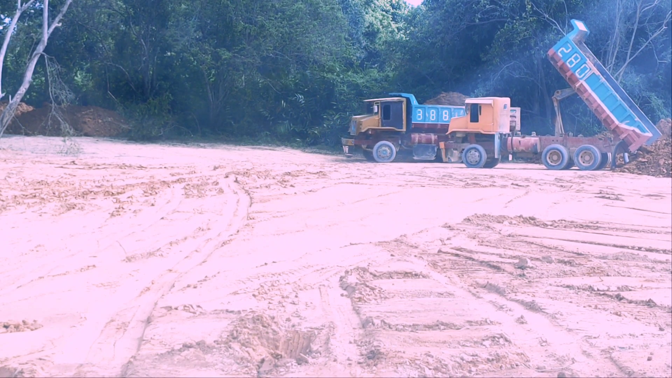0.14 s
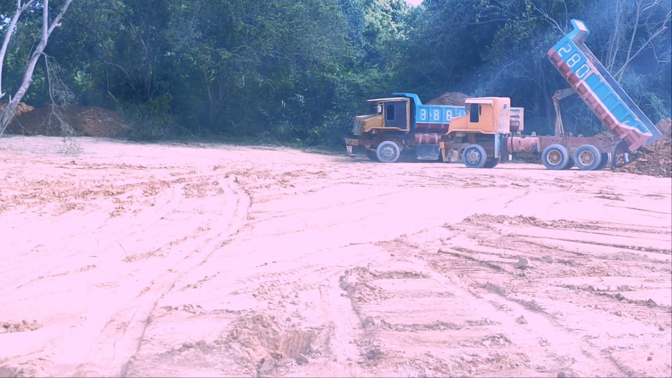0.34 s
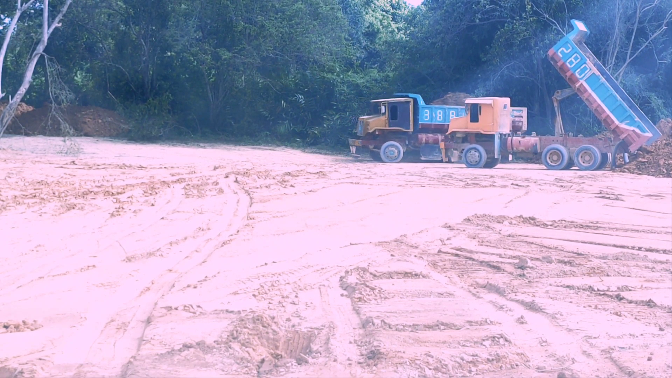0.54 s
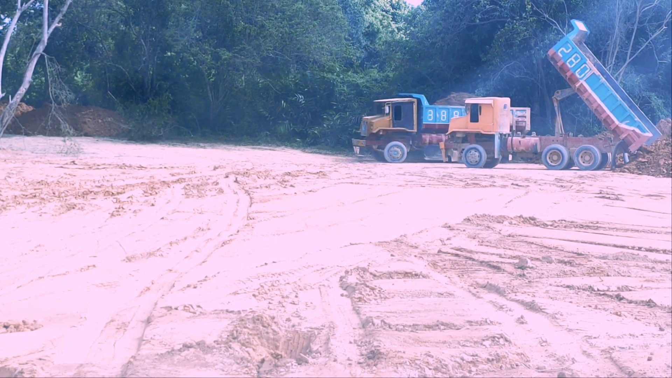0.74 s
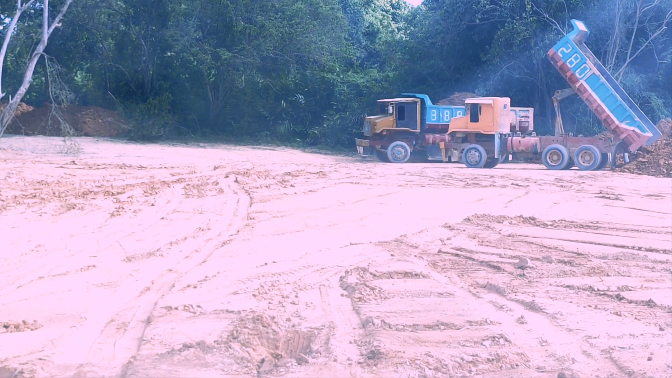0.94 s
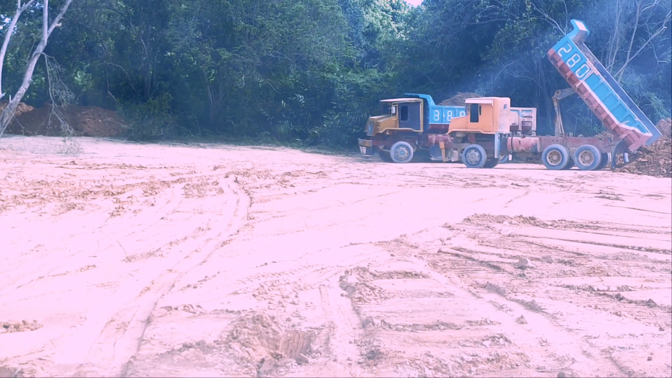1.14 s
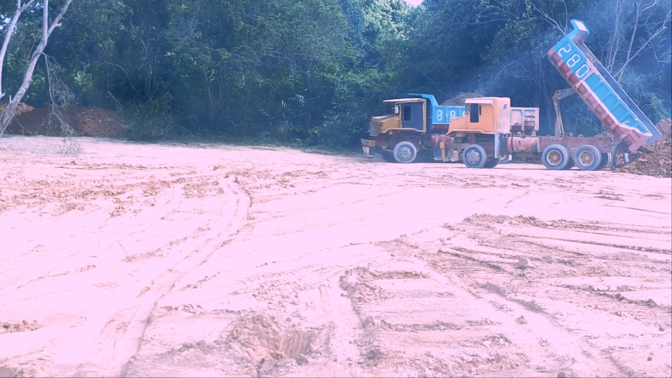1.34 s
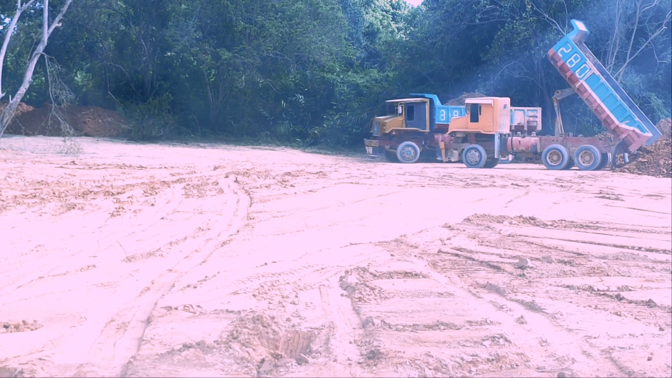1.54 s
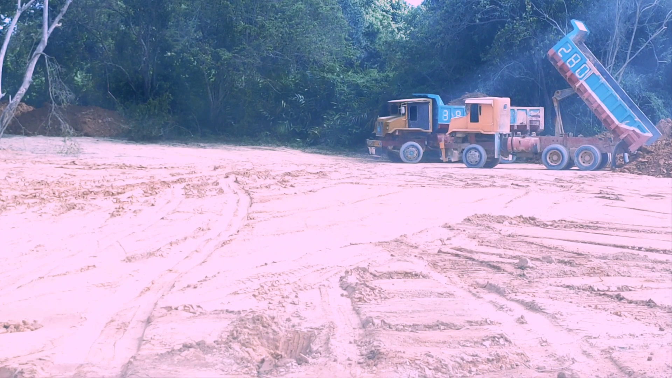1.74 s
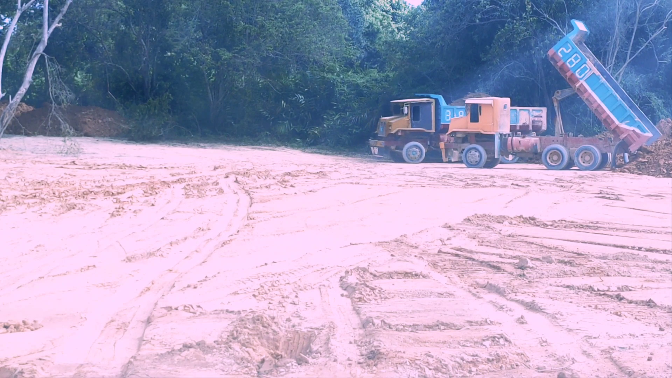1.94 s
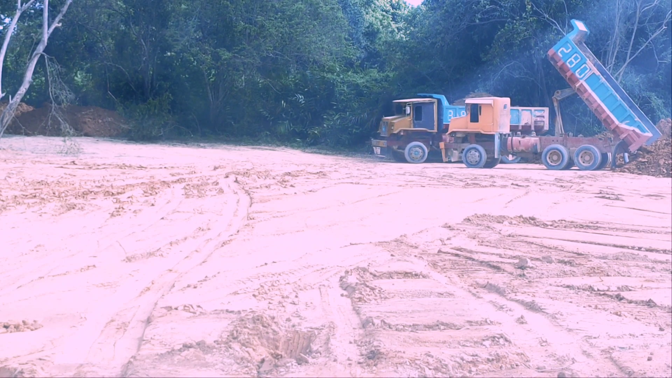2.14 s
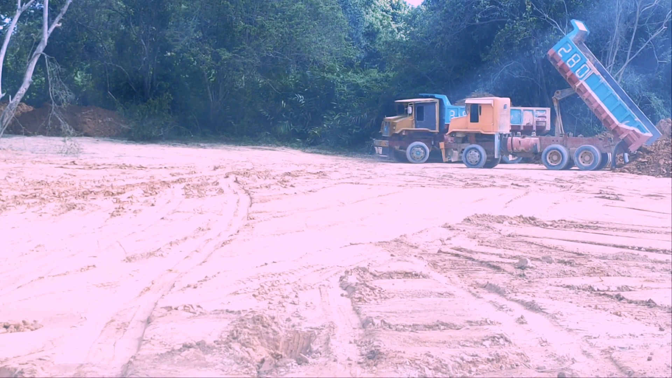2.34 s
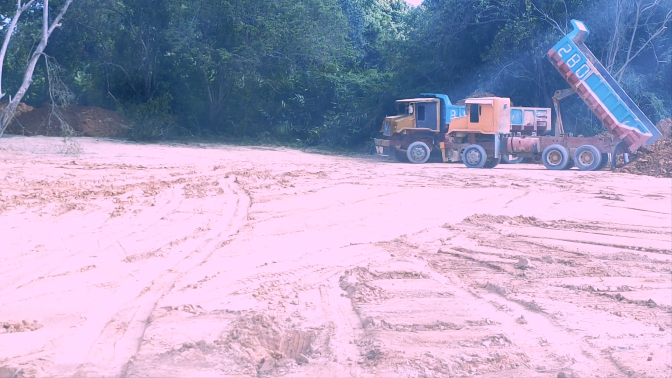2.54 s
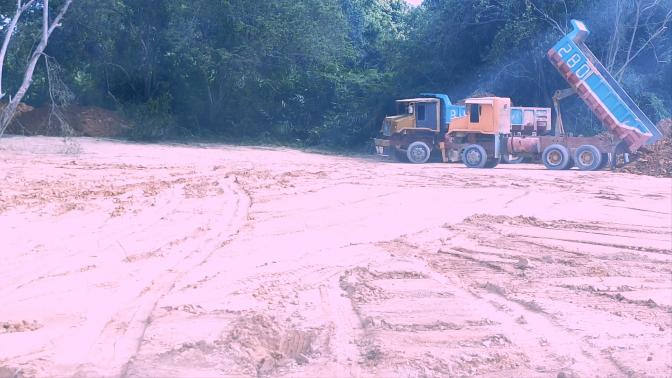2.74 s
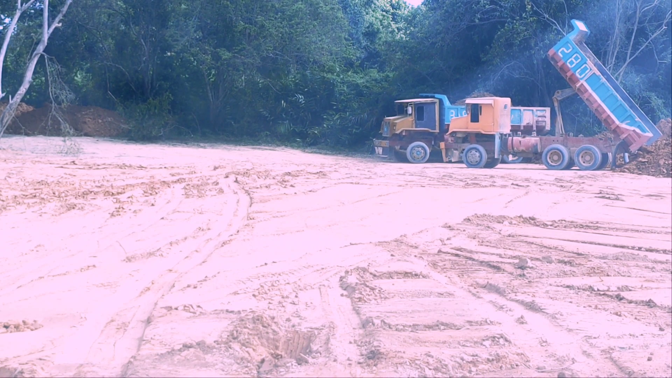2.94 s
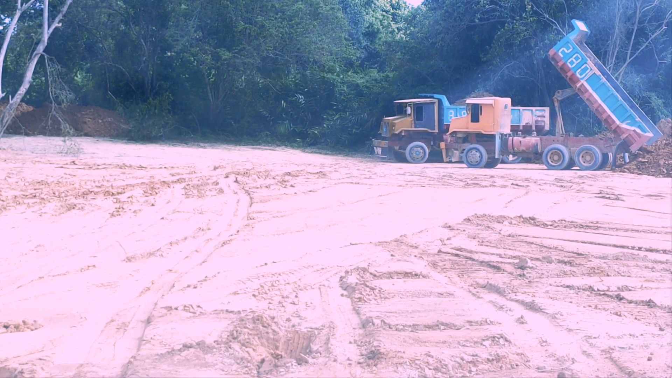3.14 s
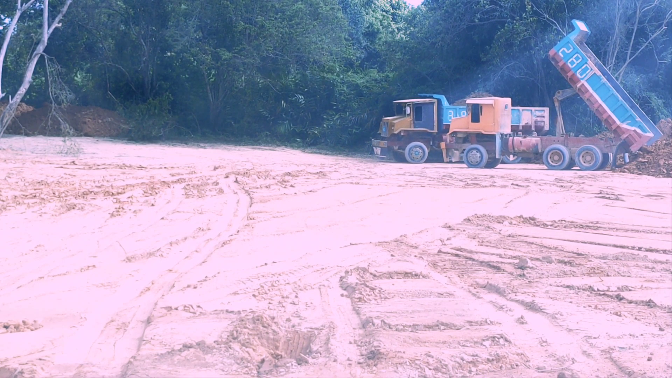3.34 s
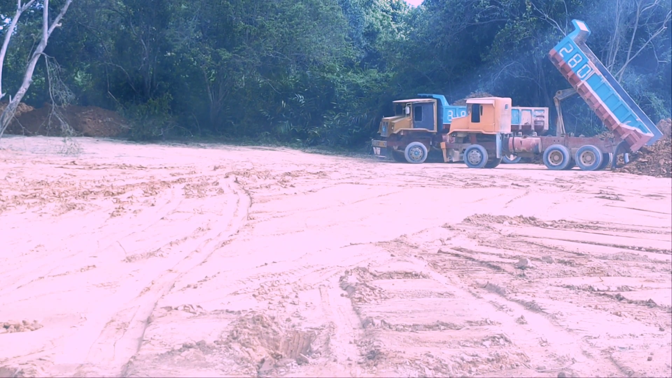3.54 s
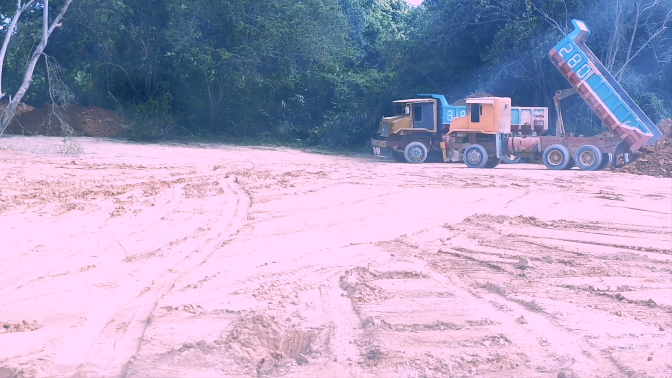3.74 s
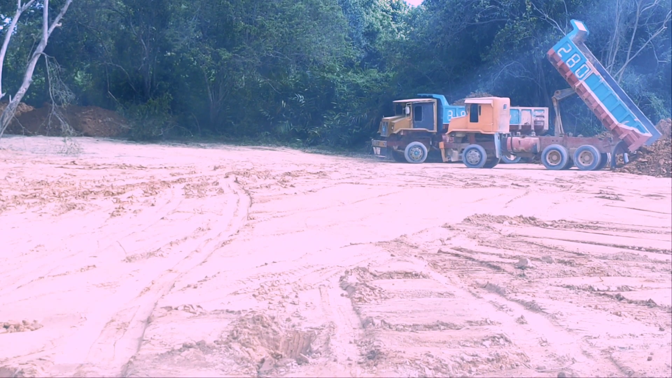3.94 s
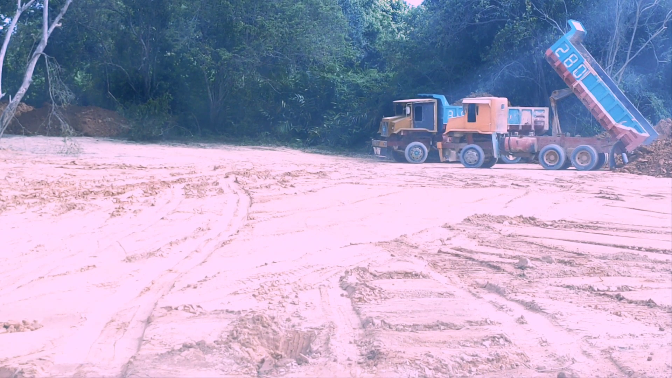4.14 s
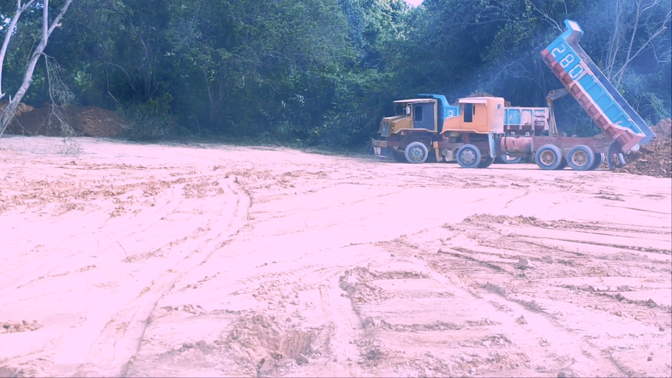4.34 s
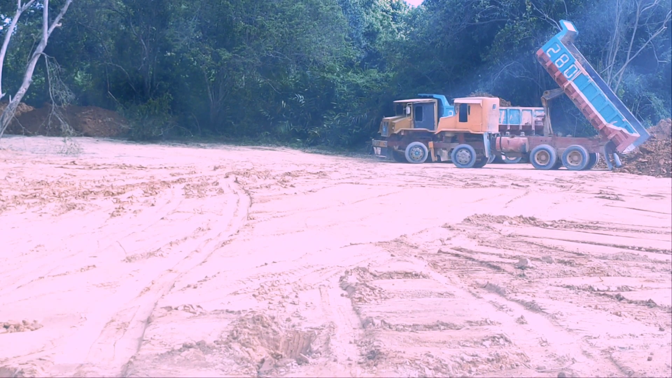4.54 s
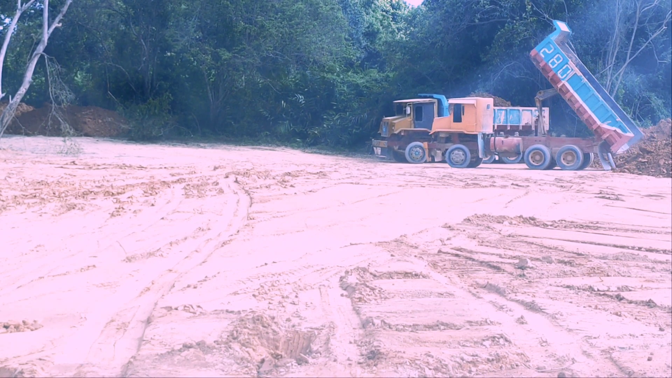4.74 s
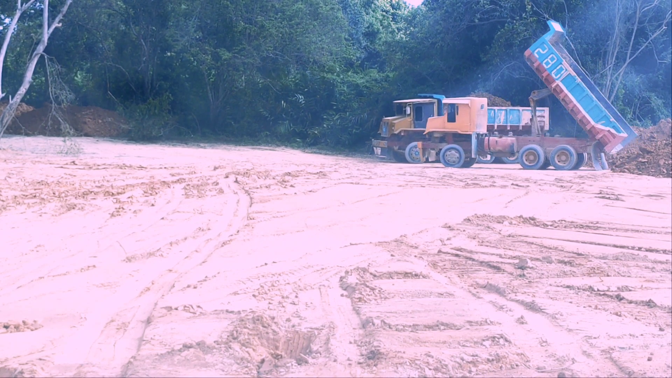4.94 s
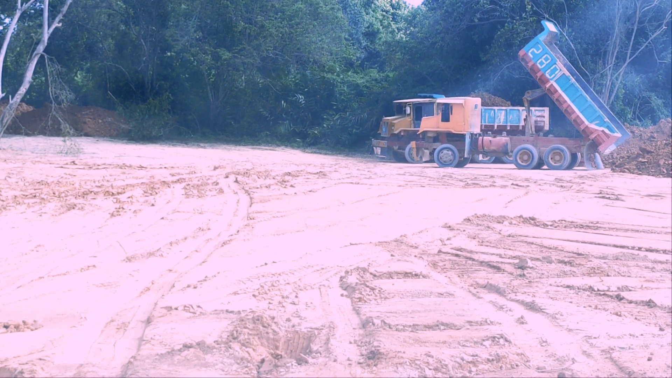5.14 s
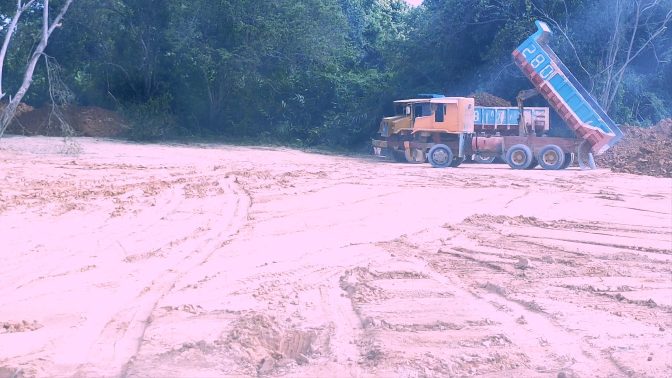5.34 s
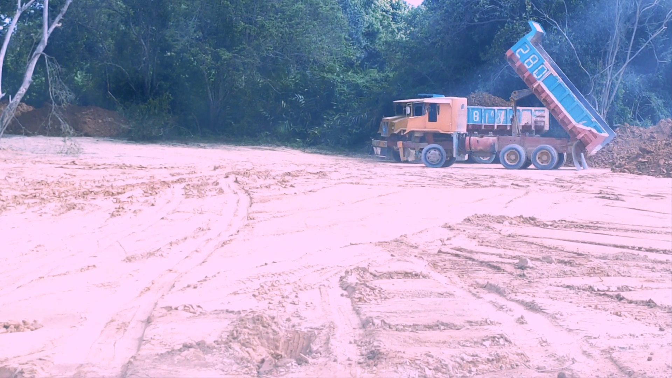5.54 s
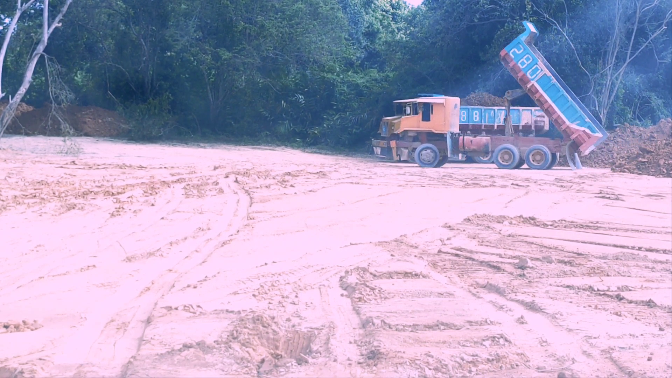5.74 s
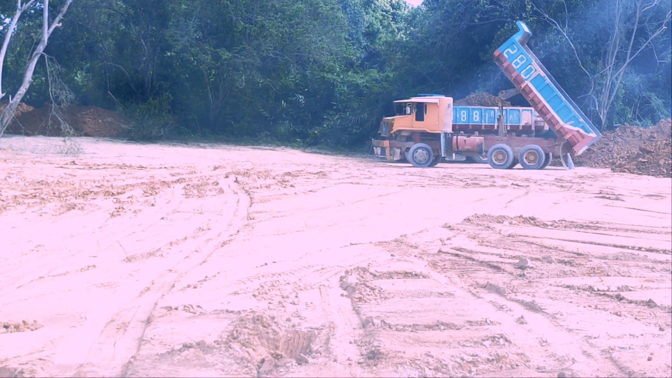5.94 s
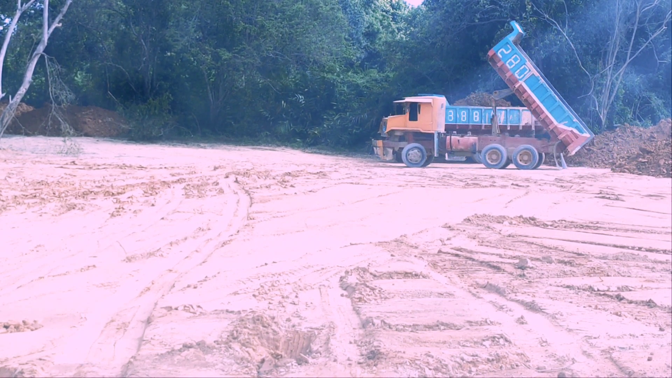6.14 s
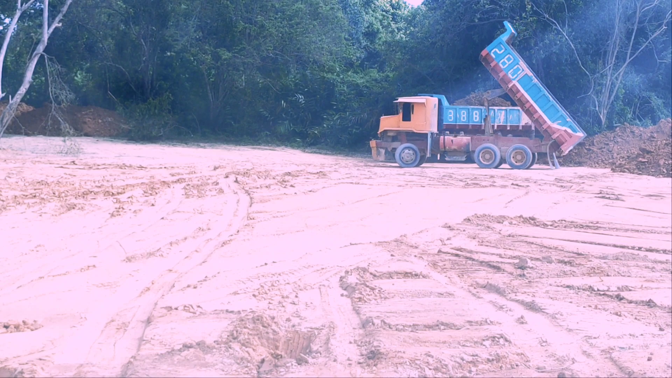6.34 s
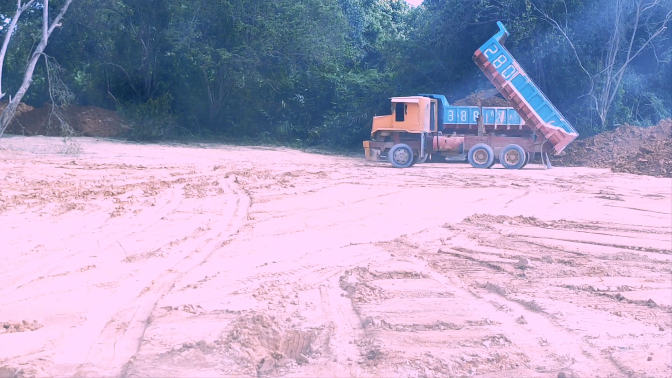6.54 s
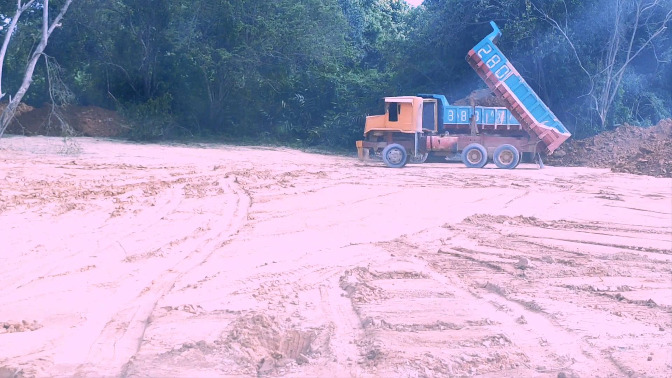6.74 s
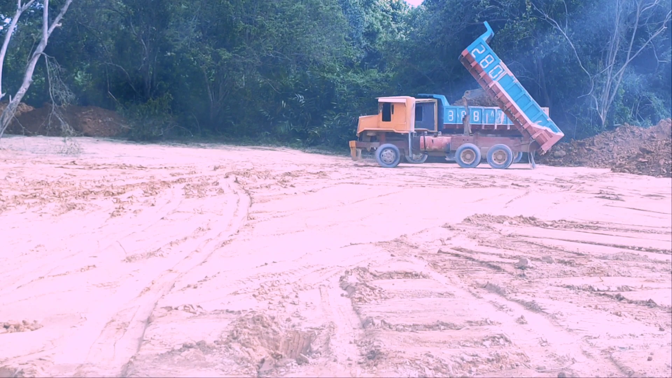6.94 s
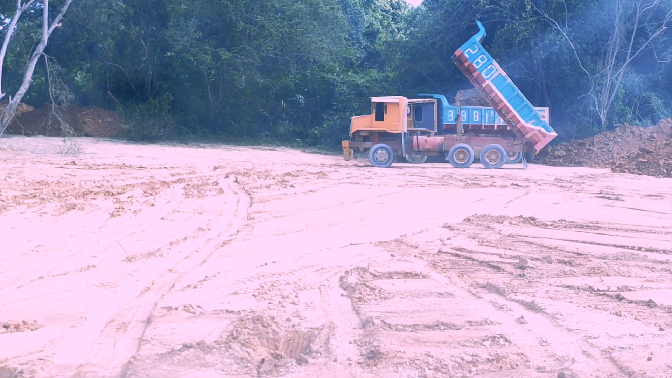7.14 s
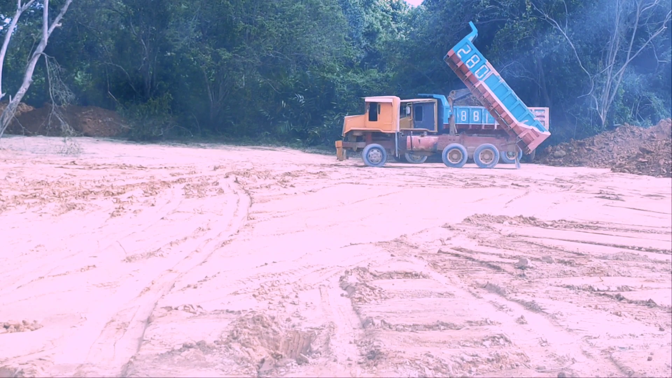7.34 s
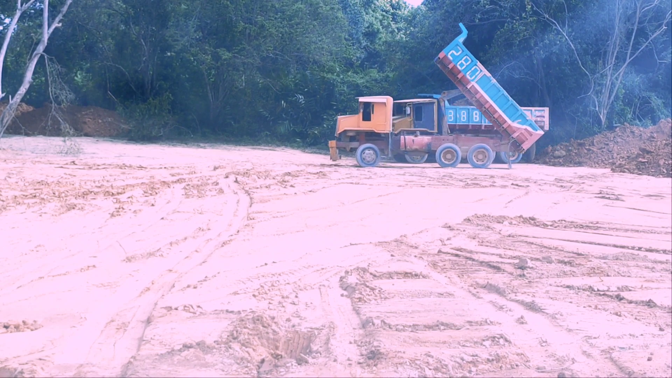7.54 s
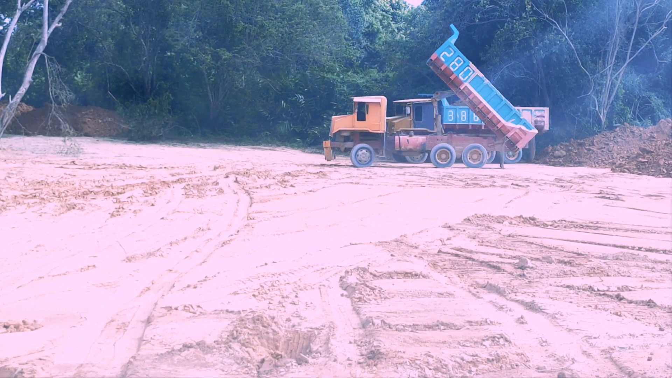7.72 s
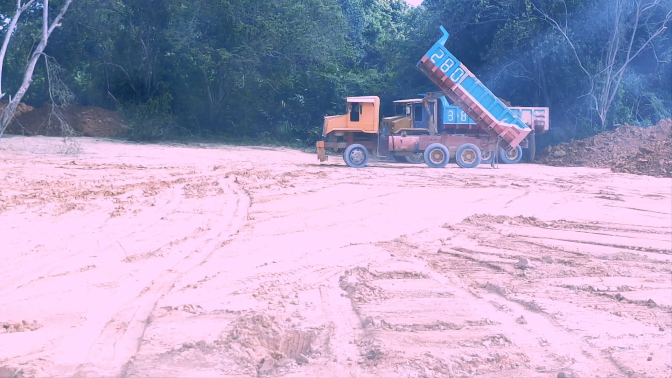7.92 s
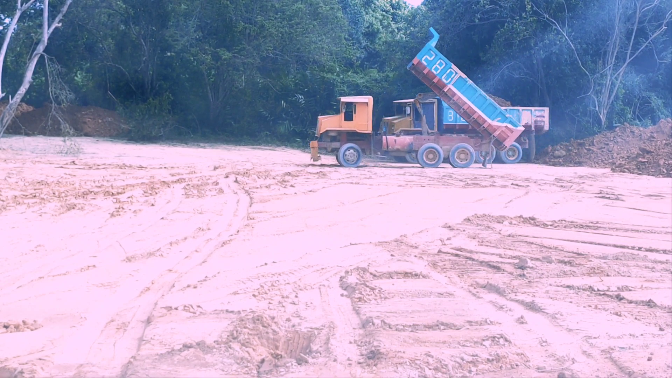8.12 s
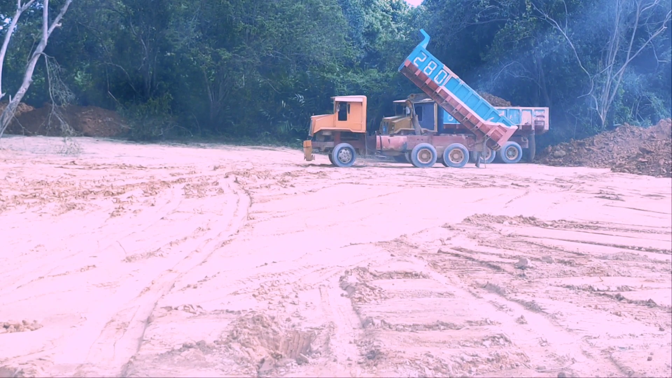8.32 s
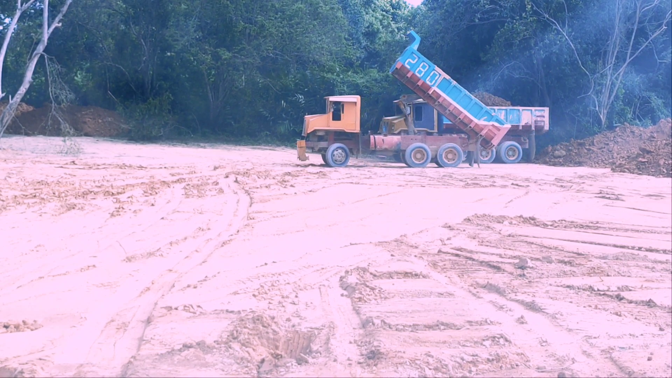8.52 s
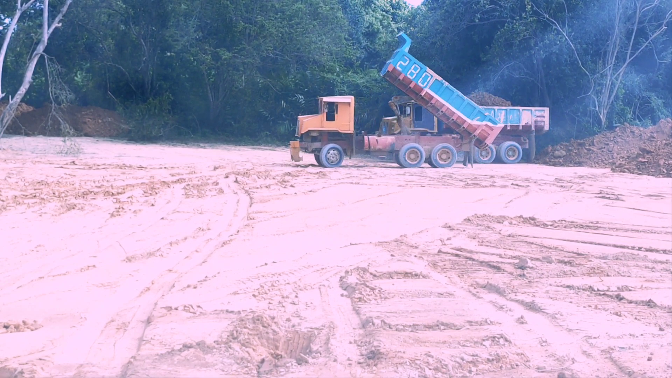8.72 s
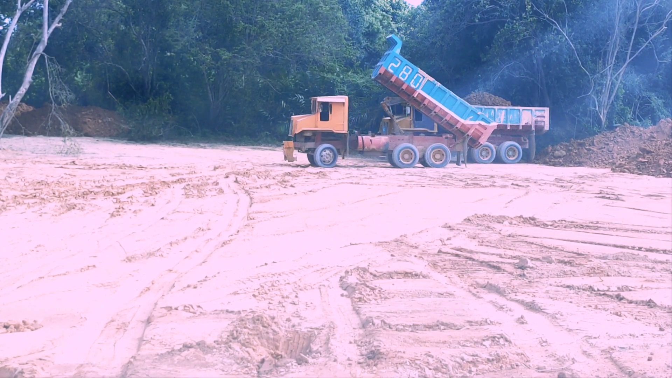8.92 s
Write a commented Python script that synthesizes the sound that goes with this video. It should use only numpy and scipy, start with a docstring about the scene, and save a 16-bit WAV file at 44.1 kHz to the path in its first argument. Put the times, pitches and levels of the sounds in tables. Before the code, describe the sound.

Low diesel truck rumble outdoors, one engine gradually revving up and approaching, while fingers rub, click and squeak on the camera.

```python
"""An earthworks site: two diesel dump trucks idle while a V8 pulls away and comes closer.
Their exhausts throb at the firing rates over a dull mechanical roar, scattered by a wooded slope.
Fingers shift on the hand-held camera: skin slides, catches and chatters on the case, which
rustles, ticks, thuds and squeaks next to the right microphone port."""
import sys
import numpy as np
from scipy import signal
from scipy.fft import rfft, irfft, next_fast_len
from scipy.io import wavfile
from scipy.ndimage import uniform_filter1d, map_coordinates

SR = 44100
rng = np.random.default_rng(int(sys.argv[2]) if len(sys.argv) > 2 else 0)


def materialize(psi):
    """Save the field psi as 16-bit PCM at rate SR to the path in sys.argv[1].

    A 1-D psi becomes a single channel; in a 2-D psi each row is a channel.
    """
    bounded = np.clip(np.atleast_2d(psi).T, -1, 1)
    quanta = np.round(bounded * 32767).astype(np.int16)
    wavfile.write(sys.argv[1], SR, quanta)


N = 400428
CYLINDERS = 8


def amp(db):
    """Decibels to gain."""
    return 10 ** (np.asarray(db) / 20)


def unit(x):
    """Scale to rms 1."""
    return x / np.sqrt(np.mean(x ** 2) + 1e-20)


def along(points, hz):
    """(Hz, value) points read on a log axis."""
    knots_hz, values = np.transpose(points)
    return np.interp(np.log(hz + 1), np.log(knots_hz + 1), values)


def curves(rows):
    """One value per sample for each column after the time."""
    times_s, *columns = np.transpose(rows)
    return [np.interp(np.arange(N) / SR, times_s, column) for column in columns]


def wobble(rate_hz):
    """Smooth random curve, rate_hz knots a second."""
    knots = rng.standard_normal(int(N * rate_hz / SR) + 4)
    grid = np.arange(0, len(knots), 1 / 8)
    return np.interp(np.arange(N) * rate_hz / SR, grid, map_coordinates(knots, [grid], mode="nearest"))


def filtered(x, response):
    """x through a complex frequency response."""
    size = next_fast_len(N + SR // 2)
    return irfft(rfft(x, size) * response(np.fft.rfftfreq(size, 1 / SR)), size)[..., :N]


def coloured(x, spectrum):
    """x through a (Hz, dB) spectrum, at rms 1."""
    return unit(filtered(x, lambda hz: amp(along(spectrum, hz))))


def resonances(modes, hz):
    """Causal response of (centre Hz, width Hz, dB) modes, alternating in sign."""
    return sum((-1) ** k * amp(db) * 1j * hz * width / (centre ** 2 - hz ** 2 + 1j * hz * width)
               for k, (centre, width, db) in enumerate(modes))


def add(out, start_s, sound):
    """Mix a short sound into out."""
    out[:, round(start_s * SR):][:, :sound.shape[1]] += sound


def burst(response, t60_s, attack_s):
    """One contact: a pair of filtered noises, dying away."""
    t = np.arange(SR // 4) / SR
    noise = rng.standard_normal((2, len(t)))
    body = irfft(rfft(noise) * response(np.fft.rfftfreq(len(t), 1 / SR)), len(t))
    return unit(body) * amp(-60 * t / t60_s) * (1 - np.exp(-t / attack_s))


def friction(grain_db):
    """Skin on plastic: noise of tiny, uneven slips."""
    return unit(rng.standard_normal((2, N)) * amp(grain_db * wobble(1500) + 0.72 * wobble(90)))


def crunch(rate_hz, spread_db, t60_s):
    """Separate slips, a few much larger than the rest; each rings at three random pitches."""
    draw = rng.random((int(rate_hz * N / SR), 8))
    t = np.arange(int(t60_s * SR)) / SR
    indices = ((draw[:, :1] * N).astype(int) + np.arange(len(t))).ravel()
    envelopes = amp(spread_db * np.minimum(-np.log(draw[:, 1:2]), 3.5) - 60 * t / t60_s)
    pitches_hz = (1500 + 14000 * draw[:, 2:]).T.reshape(2, 3, -1, 1)
    slips = [envelopes * np.sin(2 * np.pi * hz * t).sum(0) for hz in pitches_hz]
    return unit(np.array([np.bincount(indices, channel.ravel(), N)[:N] for channel in slips]))


def moving_contact(x, patchy_db):
    """The scrape changes colour as the point of contact moves."""
    spectra = signal.stft(x, nperseg=512)[2]
    patches = uniform_filter1d(rng.standard_normal(spectra.shape[1:]), size=4, axis=0)
    patches = uniform_filter1d(patches, size=9, axis=1)
    return unit(signal.istft(spectra * amp(patchy_db * unit(patches)), nperseg=512)[1][:, :N])


def held_case(x, dull, ringing, grip_db):
    """The case colours the scrape; the grip damps now one resonance, now another."""
    # Each row: centre in Hz, width in Hz, gain in dB.
    case_modes = [(2440, 160, -5), (3355, 60, 3), (3485, 55, 2), (5420, 130, -4), (5780, 70, 0),
                  (6380, 60, 0), (7210, 110, -6), (7600, 280, -3), (9420, 160, -5), (9790, 190, -6),
                  (12300, 150, -8), (14600, 500, -5)]
    hz, t, spectra = signal.stft(x, SR, nperseg=1024)
    grip = unit(uniform_filter1d(rng.standard_normal((len(case_modes), len(t))), size=14, axis=1))
    mode_power = np.array([abs(resonances([mode], hz)) for mode in case_modes]).T ** 2
    ring_power = mode_power @ amp(grip_db * grip) ** 2
    return signal.istft(spectra * np.sqrt(dull + ringing * ring_power), SR, nperseg=1024)[1][:, :N]


def strokes(rows, attack_s=0.022, t60_s=0.078):
    """Gain of sliding fingers: each stroke starts quickly, swells or fades, then comes to rest."""
    gain, t = np.zeros(N + SR), np.arange(SR) / SR
    for start_s, length_s, db, swell_db in rows:
        sliding_db = db + swell_db * (np.minimum(t / length_s, 1) - .5)
        stopping_db = -60 * np.maximum(t - length_s, 0) / t60_s
        start = max(round((start_s - attack_s / 2) * SR), 0)
        gain[start:][:SR] += amp(sliding_db + stopping_db) * np.minimum(t / attack_s, 1)
    return gain[:N]


def finger_rustle():
    """Light brushes and firm rubs over the resting grip; a rub rings the case more."""
    # Each row: start in seconds, length in seconds, relative level in dB, swell over the stroke in dB.
    brushes = [ (0.0, 0.15, -57.5, -9), (.15, 0.11, -57, 8), (.42, 0.086, -55, -11),
               (.78, 0.051, -50.5, -1), (1.015, 0.13, -60, -6), (1.22, 0.2, -58.5, -1), (1.4, 0.41, -85, 4),
               (1.815, 0.085, -57.5, 4), (1.92, 0.26, -62.5, 7), (2.058, 0.019, -55, 2),
               (2.235, 0.19, -55, 2.5), (2.64, 0.13, -64, 11), (2.825, 0.14, -60, -1),
               (3.09, 0.61, -59.5, 1.5), (3.78, 0.22, -64.5, 10), (4.3, 0.37, -67, 16),
               (5.08, 0.275, -61, 5), (5.378, 0.022, -47.5, -4), (5.425, 0.21, -58.5, -4),
               (5.74, 0.12, -62.5, -5), (5.89, 0.065, -64.5, -3), (7.62, 0.12, -61, 4),
               (7.73, 0.082, -54.5, 4), (7.82, 0.24, -53, -0.5), (8.205, 0.11, -64.5, -1)]
    rubs = [(6.385, 0.059, -55, 22), (6.445, 0.087, -56.5, -10), (6.6, 0.11, -60, -17),
            (6.71, 0.057, -56, 5), (6.764, 0.075, -46, -6), (6.84, 0.047, -47.5, 5),
            (6.925, 0.054, -45.5, -4), (6.982, 0.028, -45, 5.5), (7.14, 0.1, -51, -1.5),
            (7.315, 0.11, -58, -7), (7.705, .05, -61, 6)]
    # Each row: frequency in Hz, relative density in dB.
    brush_spectrum = [(1000, -3), (2000, 0.5), (3200, -4.5), (4300, 0), (5200, -6), (6200, -2), (7300, 2.5),
                      (8800, 2.5), (10500, -6), (13000, -5.5), (14800, -7.5), (15800, -8)]
    rub_spectrum = [(500, -25), (1300, -8), (1900, -2), (2400, 2), (2900, -1.5), (3400, 1), (4400, 1.5),
                    (5400, 0), (6000, -3.5), (7600, 4), (8600, 5), (9600, 1), (11000, -2.5), (15500, -5.5)]
    # Each row: time in seconds, relative level in dB.
    resting_grip = [(0, -68.5), (2.6, -62.5), (4.5, -66.5), (5.9, -69), (6.5, -68), (8.3, -70.5),
                    (9.08, -75)]
    light_grit = crunch(rate_hz=300, spread_db=3, t60_s=.005)
    firm_grit = crunch(rate_hz=800, spread_db=3, t60_s=.003)
    light = coloured(friction(grain_db=0) + .55 * light_grit, brush_spectrum)
    firm = coloured(friction(grain_db=1.5) + .9 * firm_grit, rub_spectrum)
    light = moving_contact(light, patchy_db=2)
    firm = moving_contact(firm, patchy_db=1.5)
    light = held_case(light, dull=.6, ringing=.7, grip_db=3.5)
    firm = held_case(firm, dull=.4, ringing=1.8, grip_db=2.5)
    touch = np.hypot(strokes(brushes), amp(curves(resting_grip)[0]))
    return touch * amp(3.5) * light + strokes(rubs) * amp(6.5) * firm


def skin_ticks():
    """Skin catches on the case; a firmer catch reaches lower in frequency."""
    # Each row: start in seconds, relative level in dB, T60 in seconds, lower edge in Hz.
    catches = [(.1535, -32, .02, 5000), (.179, -30, 0.029, 5170), (0.22, -38, 0.083, 6000),
               (.2384, -35, .04, 3000), (.3912, -34, 0.027, 8500), (.4328, -32, .021, 8500),
               (.474, -41, .028, 6500), (.7842, -41, 0.022, 4500), (.7941, -40, .03, 5000),
               (0.8426, -41, 0.032, 6000), (.9357, -43, .018, 8000), (1.2226, -38.5, 0.02, 5500),
               (1.299, -41, 0.024, 6000), (1.370, -35, 0.032, 7000), (1.6168, -43.5, 0.02, 6500),
               (1.7793, -46, .014, 6500), (1.865, -37, .03, 7000), (2.0575, -41, .015, 6000),
               (2.0632, -37, .022, 6000), (2.2334, -48, .022, 6500), (2.343, -32.5, .033, 6500),
               (2.7232, -34, .016, 6500), (2.736, -41, .02, 6500), (2.827, -32, .014, 7000),
               (3.0895, -43.5, .025, 6000), (3.638, -41, .035, 4000), (4.636, -49, .016, 7000),
               (5.2875, -53, .025, 6000), (5.3344, -40, .02, 4000), (5.381, -32.5, .037, 6040),
               (5.4272, -39, 0.033, 5000), (5.8342, -46, .025, 6000), (6.1705, -53, .025, 6000),
               (6.7518, -23.5, 0.018, 3000), (6.792, -24.5, 0.031, 1900), (6.8464, -36, .02, 5000),
               (6.9243, -40, .015, 3500), (6.932, -28.5, 0.037, 4000), (7.1974, -28, 0.039, 3000),
               (7.208, -39, 0.018, 4500), (7.5582, -43.5, .02, 7000), (7.7326, -33.5, 0.033, 2800),
               (8.06, -39, 0.053, 6500), (8.2034, -42.5, 0.041, 8000)]
    # Each row: frequency in Hz, relative density in dB.
    spectrum = [(1500, 0), (3000, 1.5), (5500, -0.5), (8300, 4), (11000, -1.5), (15000, -3)]
    out = np.zeros((2, N + SR))
    for start_s, db, t60_s, edge_hz in catches:
        response = lambda hz: hz ** 4 / np.hypot(hz ** 4, edge_hz ** 4) * amp(along(spectrum, hz))
        add(out, start_s, amp(db - 4) * burst(response, t60_s, attack_s=.00024))
    return out[:, :N]


def case_snaps():
    """The hollow case creaks and snaps under the grip."""
    # Each row: start in seconds, relative level in dB, T60 in seconds, pitch in Hz.
    snaps = [(.1535, -48, .015, 2500), (0.178, -51, .015, 2500), (.239, -56, .035, 2400),
             (2.057, -47, .02, 2280), (2.0632, -48, 0.021, 2500), (2.335, -54, .03, 2500),
             (3.6385, -50, 0.032, 2540), (4.429, -54, .035, 2520), (5.3344, -52, 0.018, 2500),
             (5.446, -50.5, 0.043, 2500), (6.709, -44, .028, 2400), (6.727, -45, .028, 2400),
             (6.7517, -30.5, 0.022, 2400), (6.7926, -39, .032, 2550), (7.007, -49, 0.017, 2450),
             (7.198, -44, .038, 2430), (7.5573, -36.5, 0.027, 2570), (7.57, -46, .03, 2500),
             (7.722, -46, .035, 2400), (7.7328, -39.5, 0.047, 2450)]
    # Each row: multiple of the pitch, width in Hz, gain in dB.
    shell_modes = [(.58, 700, 2.5), (1, 400, 14), (1.32, 280, 11)]
    out = np.zeros((2, N + SR))
    for start_s, db, t60_s, pitch_hz in snaps:
        modes = [(ratio * pitch_hz, width_hz, gain_db) for ratio, width_hz, gain_db in shell_modes]
        add(out, start_s, amp(db) * burst(lambda hz: resonances(modes, hz), t60_s, attack_s=.0003))
    return out[:, :N]


def camera_thuds(width_hz=360):
    """The hand bumps the whole camera; the pitch depends on where it presses."""
    # Each row: start in seconds, relative level in dB, pitch in Hz.
    bumps = [(.238, -48, 526), (2.055, -35.5, 490), (2.335, -38.5, 463), (6.79, -40.5, 700),
             (7.558, -42, 726), (7.732, -44, 600)]
    out = np.zeros((2, N + SR))
    for start_s, db, pitch_hz in bumps:
        response = lambda hz: resonances([(pitch_hz, width_hz, 0)], hz) ** 2
        add(out, start_s, amp(db) * burst(response, t60_s=.077, attack_s=.0017))
    return out[:, :N]


def finger_squeaks(upper_hz=13630):
    """Stick-slip of a fingertip on the case: part shrill whistle, part rasp."""
    # Each row: start in seconds, relative level in dB, length in seconds, pitch in Hz,
    # roughness from 0 to 1, upper resonance in dB.
    squeaks = [(.179, -31, .0097, 8470, 0.2, -30), (.364, -53.5, 0.018, 8600, .6, -30),
               (.4325, -39.5, 0.0056, 8830, .74, -16), (.4735, -39.5, 0.01, 8690, 0.4, -13),
               (1.305, -44.5, .02, 8690, .5, -14), (2.064, -41.5, 0.017, 8570, 0.3, -22),
               (2.136, -46, .016, 8630, 0.4, -20), (2.248, -48, .022, 8690, .3, -24),
               (2.271, -39.5, 0.015, 8690, 0.05, -24), (2.294, -42, .033, 8690, .3, -17),
               (2.328, -38, 0.016, 8780, 0.4, -14), (2.343, -32, 0.017, 8760, .33, -16),
               (2.371, -35.5, 0.051, 8725, 0, -15), (2.432, -30.5, .023, 8760, 0.14, -11),
               (2.464, -42.5, .016, 8770, 0.4, -8), (2.722, -43.5, .022, 8580, 0.5, -20),
               (2.829, -42.5, 0.047, 8880, 0.9, -10), (2.872, -42.5, 0.068, 8750, .6, -9),
               (3.739, -45, 0.01, 8740, 0.4, -16), (4.636, -34, 0.012, 8300, 0.1, -34),
               (4.692, -61, 0.0071, 8400, 0.5, -30), (4.759, -55, .008, 8500, 0.3, -30),
               (5.018, -54, .008, 8700, .6, -25)]
    t = np.arange(N) / SR
    pitch_hz = np.full(N, float(squeaks[0][3]))
    tone_gain, rasp_gain, upper_gain = np.zeros((3, N))
    for start_s, db, length_s, hz, roughness, upper_db in squeaks:
        gain = amp(db) * np.interp(t - start_s, [0, .001, .6 * length_s, 1.4 * length_s], [0, 1, .7, 0])
        tone_gain += gain * np.sqrt(1 - roughness)
        rasp_gain += gain * np.sqrt(roughness)
        start = round(start_s * SR)
        pitch_hz[start:], upper_gain[start:] = hz, amp(upper_db)
    whistle = lambda hz, stray_hz: np.sin(2 * np.pi * np.cumsum(hz + stray_hz * wobble(500)) / SR)
    chatter = amp(3.2 * wobble(250))
    tone = unit(chatter * (whistle(pitch_hz, stray_hz=90) + upper_gain * whistle(upper_hz, stray_hz=70)))
    rasp = unit(filtered(friction(grain_db=5), lambda hz: resonances([(8750, 1300, 0)], hz) ** 2))
    return amp(5.5) * tone_gain * np.array([tone, np.zeros(N)]) + rasp_gain * amp([[2.5], [-4]]) * rasp


def at_ports(mid_side, lag_s=.00054):
    """Sound from the right end of the case reaches the left port later and weaker."""
    # Each row: frequency in Hz, left minus right in dB.
    balance = [(1000, -2), (2400, -9.5), (3500, -3), (5400, -10), (7500, -13.5), (8800, -1.5), (10000, -2),
               (12500, -5.5), (14000, -9.5), (15300, -12)]
    mid, side = mid_side
    pair = np.array([mid + side, mid - side]) / np.sqrt(2)
    half = np.array([[.5], [-.5]])
    return filtered(pair, lambda hz: amp(half * along(balance, hz))
                    * np.exp(-2j * np.pi * hz * lag_s * half))


def wooded_slope(pair):
    """Two unrelated signals as a scattered field, most alike in the bass."""
    # Each row: frequency in Hz, left-right correlation.
    coherence = [(60, 0.68), (130, 0.44), (290, 0.87), (640, -0.013), (900, 0.25), (1280, -0.92),
                 (1900, 0.34), (3100, -0.097)]
    angle = lambda hz: np.arccos(along(coherence, hz)) / 2
    mid, side = filtered(pair, lambda hz: np.array([np.cos(angle(hz)), np.sin(angle(hz))]))
    return np.array([mid + side, mid - side])


def engine_phase(rate_hz, hunting):
    """Periods completed by an engine whose speed hunts a little."""
    return np.cumsum(rate_hz * (1 + hunting * wobble(4))) / SR


def firing_noise(cycles, repeat_share, depth):
    """Noise pulsing at each firing; a share recurs every four-stroke cycle."""
    size = int(N / cycles[-1])
    pattern = np.array([np.interp(cycles % 1 * size, np.arange(size), one_cycle)
                        for one_cycle in rng.standard_normal((2, size))])
    fresh = rng.standard_normal((2, N))
    pulses = 1 + depth * np.cos(2 * np.pi * CYLINDERS * cycles)
    return unit(pulses * (np.sqrt(repeat_share) * unit(pattern) + np.sqrt(1 - repeat_share) * fresh))


def mechanical_roar(near_firings, far_firings, v8_cycles):
    """Rumble and clatter tied to the cycles of all three diesels."""
    # Each row: time in seconds, relative rumble and clatter levels in dB.
    levels = [(0, -45.5, -54.5), (2.3, -46, -54), (4.5, -45.5, -54.5), (6.5, -44.5, -53.5),
              (8.2, -42.5, -54), (8.6, -43, -54), (9.08, -43, -54.5)]
    # Each row: frequency in Hz, relative density in dB.
    rumble_spectrum = [(20, -20), (32, -9), (42, 1), (55, -1), (75, 3), (100, -5), (130, -1), (158, -6),
                       (176, -7), (205, -2.5), (225, -6), (270, -5), (340, -13.5), (450, -24), (700, -72.5)]
    clatter_spectrum = [(200, -15), (380, -0.5), (470, 2), (520, -2), (590, 0.5), (720, -6), (850, -2),
                        (1100, -11), (1330, -5.5), (1600, -13.5), (2400, -18.5), (3500, -22.5),
                        (6000, -27.5), (15000, -35.5)]
    engines = (near_firings / CYLINDERS, far_firings / CYLINDERS, v8_cycles)
    roar = sum(firing_noise(cycles, repeat_share=.42, depth=.22) for cycles in engines)
    rattle = sum(firing_noise(cycles, repeat_share=.24, depth=.22) for cycles in engines)
    rumble_db, clatter_db = curves(levels)
    puffs = 1 + .4 * np.cos(np.pi * near_firings) + .3 * np.cos(2 * np.pi * near_firings)
    rumble = amp(rumble_db) * unit(puffs * coloured(roar, rumble_spectrum))
    flutter_db = .7 * wobble(22)
    clatter = amp(clatter_db + 2.5 + flutter_db) * coloured(rattle, clatter_spectrum)
    return rumble + clatter


def exhaust(phase, orders, waver_db):
    """Clean engine orders, each wavering in the open air."""
    return sum(amp(db + waver_db * wobble(3.065)) * np.sqrt(2)
               * np.sin(2 * np.pi * (order * phase + rng.random())) for order, db in orders)


def chug(phase, orders, uneven_db):
    """Orders in step make distinct puffs, strong and weak by turns, no two quite alike."""
    puffs = sum(amp(db) * np.sqrt(2) * np.cos(2 * np.pi * order * phase) for order, db in orders)
    return amp(uneven_db * wobble(30)) * puffs


def idling_exhausts(near_firings, far_firings):
    """The near truck chugs, the far one drones."""
    # Each row: multiple of the firing rate, level in dB.
    near_orders = [(.5, -43.5), (1, -38), (1.5, -54), (2, -60), (2.25, -65), (3, -61.5), (3.5, -64),
                   (4, -61), (4.25, -64), (4.5, -64), (5.5, -65), (6.125, -73), (7.375, -72), (7.625, -71),
                   (7.75, -64), (8.25, -70), (9.375, -72.5), (9.5, -73), (9.625, -73), (9.875, -69.5),
                   (10.5, -72), (11.375, -77), (13.75, -77)]
    far_orders = [(1, -53), (2, -51.5), (2.5, -64), (3, -57), (3.25, -62), (3.375, -58), (3.5, -54.5),
                  (4, -65), (6, -61.5), (8, -70), (10, -72), (14.5, -76), (16, -77)]
    return chug(near_firings, near_orders, uneven_db=.5) + exhaust(far_firings, far_orders, waver_db=1.4)


def v8_boom(cycles, centre_hz=199, width_hz=13.7):
    """A hollow resonance booms as the V8 works harder."""
    # Each row: time in seconds, level in dB.
    levels = [(4.5, -69), (5.9, -57), (7.3, -59), (8.0, -58.5), (8.35, -60.5), (8.55, -48), (9.08, -50.5)]
    drive = firing_noise(cycles, repeat_share=.39, depth=.17)[0]
    ring = filtered(drive, lambda hz: resonances([(centre_hz, width_hz, 0)], hz) ** 2)
    return amp(curves(levels)[0]) * unit(ring)


def v8_exhaust(cycles):
    """Firing tone and the lope of uneven banks, growing as the V8 clears a heap and comes closer."""
    # Each row: time in seconds, firing tone level in dB, lope gain in dB.
    approach = [(1.9, -62, -60), (2.3, -47, -57), (2.9, -48, -55), (3.8, -55, -48), (4.4, -50, -48),
                (5.4, -40, -44), (5.9, -44, -45.5), (6.35, -38, -45), (6.7, -38, -46.5), (7.15, -33.5, -43),
                (7.55, -36.5, -44), (7.75, -34.5, -43), (8.1, -28.5, -40), (8.3, -34.5, -46.5),
                (8.5, -30, -40), (9.08, -29, -43.5)]
    # Each row: multiple of the cycle rate, relative level in dB.
    bank_orders = [(5, 1), (9, -9), (10, -10), (11, -1), (13, -7)]
    # Each row: frequency in Hz, exhaust pipe gain in dB.
    pipe = [(25, -33), (35, -10), (39, -1), (43, 9), (50, 6), (70, 3), (85, 0.5), (95, -5), (105, -4),
            (125, -30)]
    firing_db, lope_db = curves(approach)
    firing = exhaust(cycles, [(CYLINDERS, 0)], waver_db=.4)
    banks = exhaust(cycles, bank_orders, waver_db=1.5)
    lope = filtered(banks, lambda hz: amp(along(pipe, hz)))
    return amp(firing_db) * firing + amp(lope_db) * lope


def scene():
    """Three trucks across the site and the hand on the camera."""
    # The driver works the throttle. Each row: time in seconds, four-stroke cycles per second.
    v8_speed = [(2.1, 5.0), (3.6, 5.5), (5.0, 6.55), (5.35, 7.05), (5.75, 7.18), (6.0, 7.6), (6.35, 7.45),
                (6.78, 7.95), (7.05, 7.5), (7.45, 7.5), (7.85, 8.08), (8.12, 7.68), (8.4, 8.35),
                (8.7, 8.45), (9.08, 9.0)]
    near_firings = engine_phase(60.02, hunting=.0007)
    far_firings = engine_phase(56.93, hunting=.001)
    v8_cycles = engine_phase(curves(v8_speed)[0], hunting=.001)
    exhausts = idling_exhausts(near_firings, far_firings) + v8_exhaust(v8_cycles)
    scattered = wooded_slope(mechanical_roar(near_firings, far_firings, v8_cycles))
    direct = (exhausts + v8_boom(v8_cycles)) * amp([[-.5], [.5]])
    handling = finger_rustle() + skin_ticks() + case_snaps() + camera_thuds() + finger_squeaks()
    return direct + scattered + at_ports(handling)


def record(dry):
    """The camera keeps nothing above its band limit."""
    return filtered(dry, lambda hz: hz < 15600)


dry = scene()
out = record(dry)
materialize(out)
```